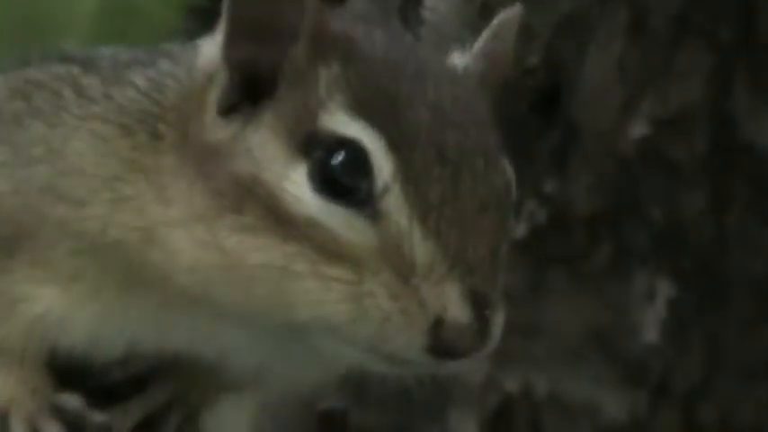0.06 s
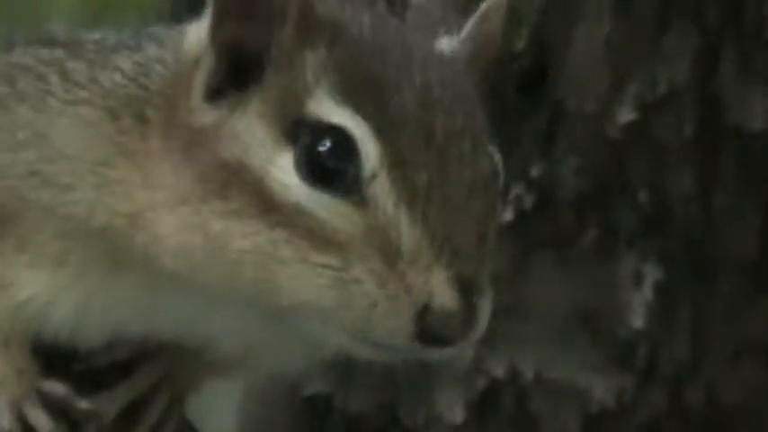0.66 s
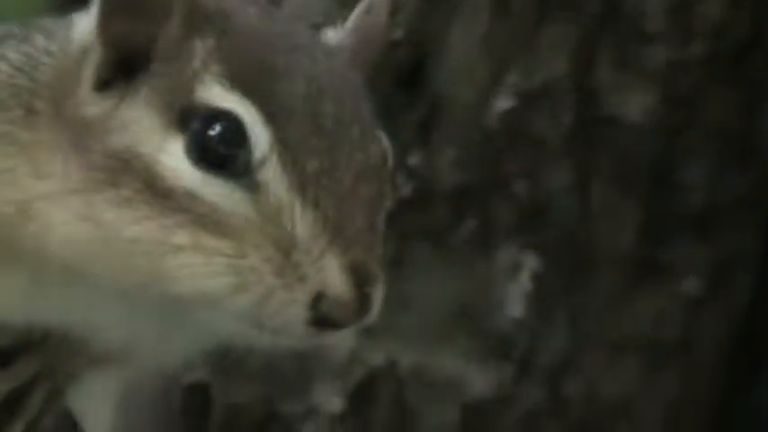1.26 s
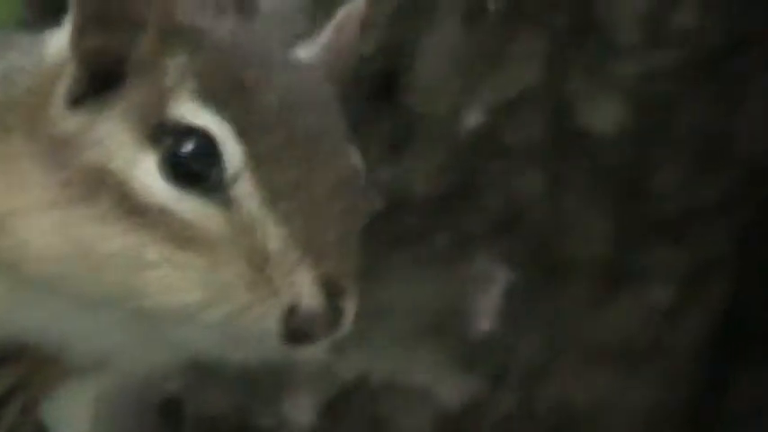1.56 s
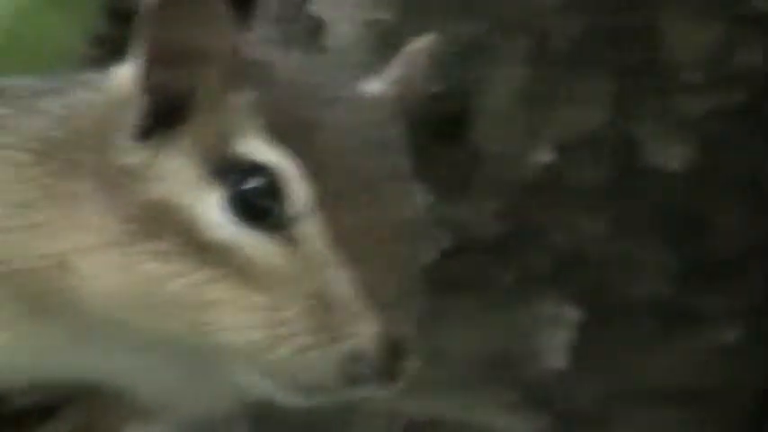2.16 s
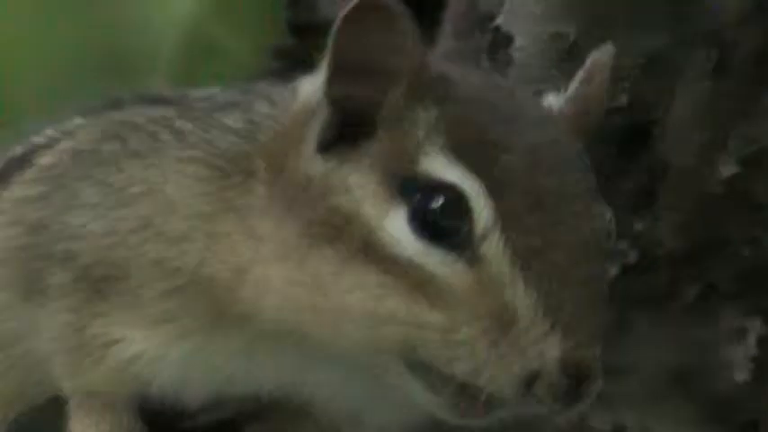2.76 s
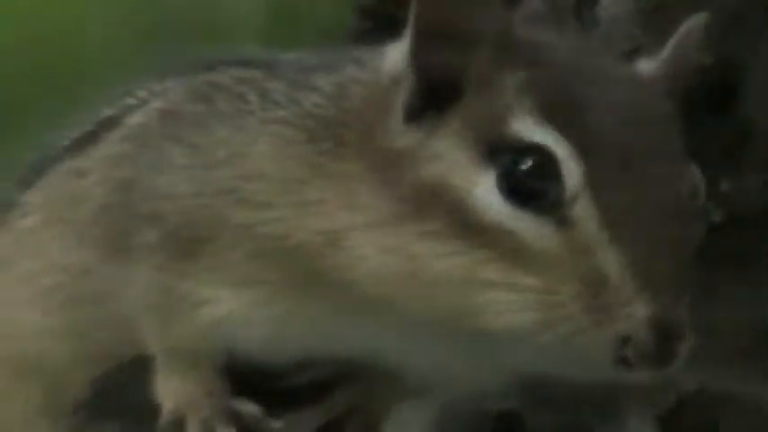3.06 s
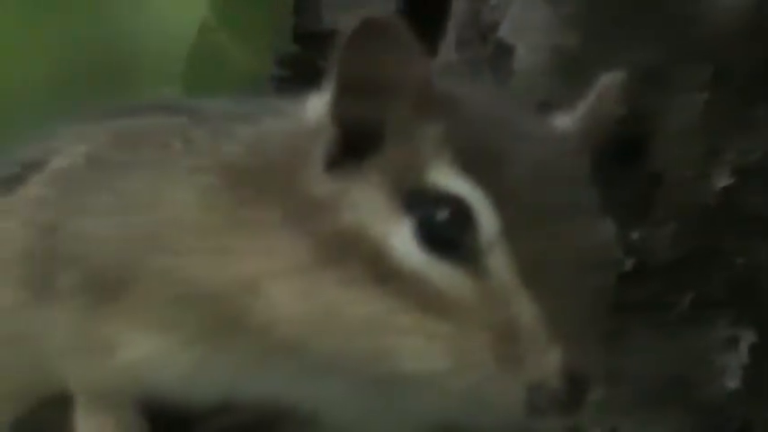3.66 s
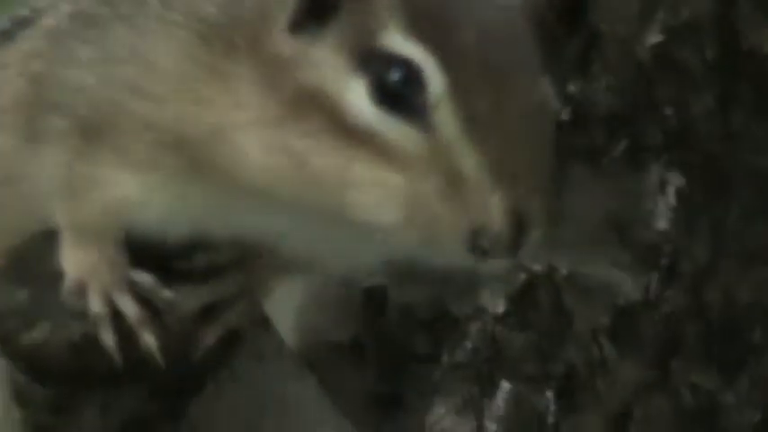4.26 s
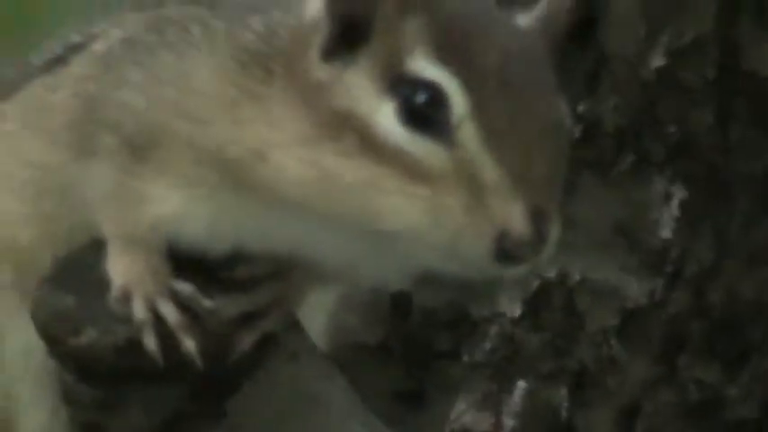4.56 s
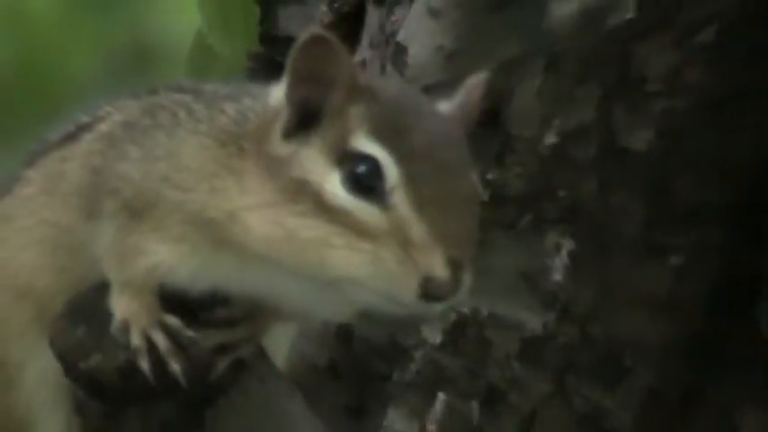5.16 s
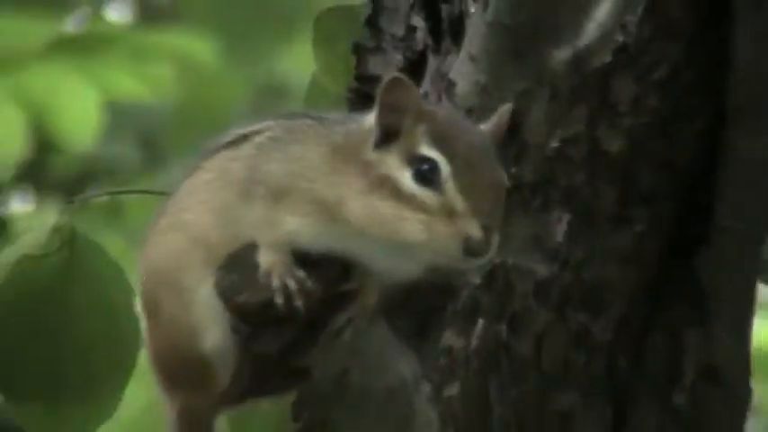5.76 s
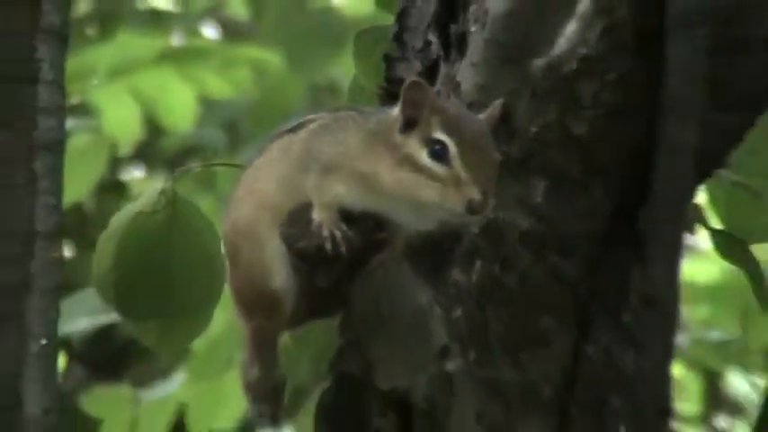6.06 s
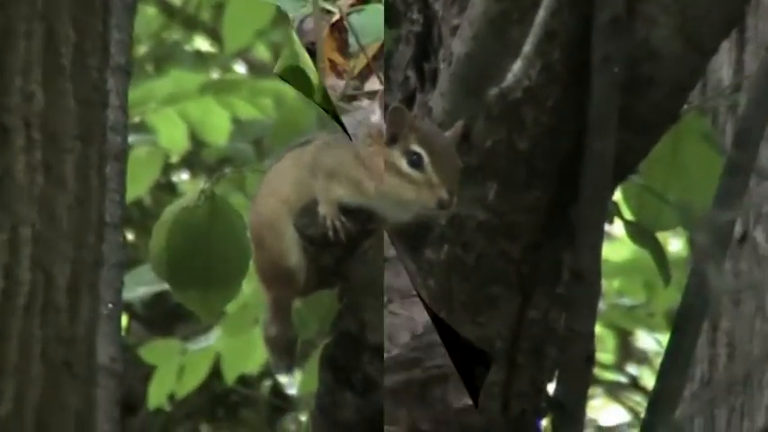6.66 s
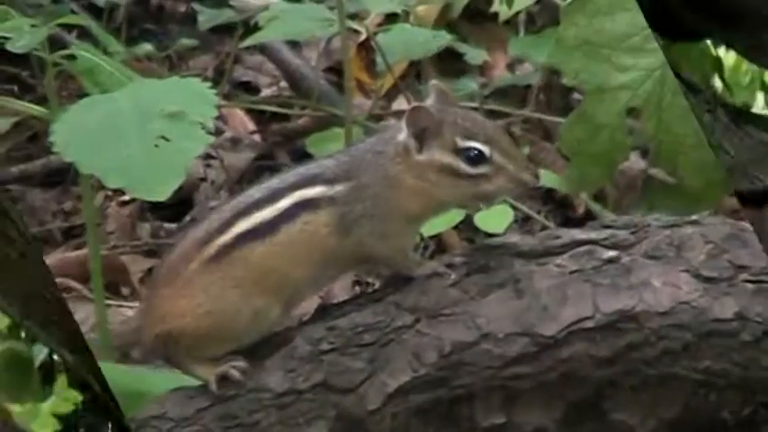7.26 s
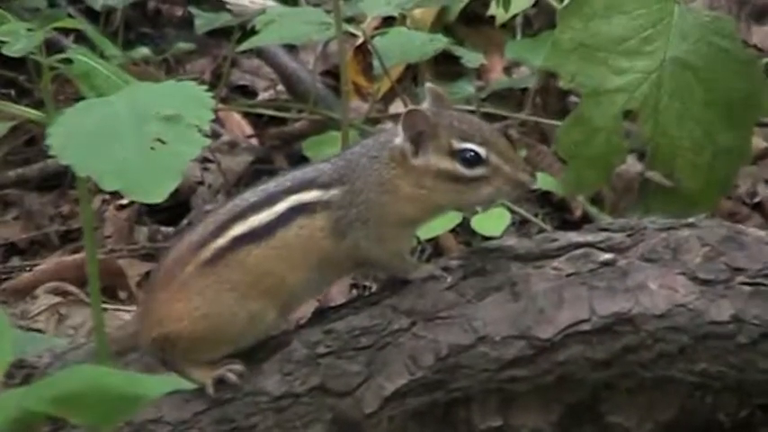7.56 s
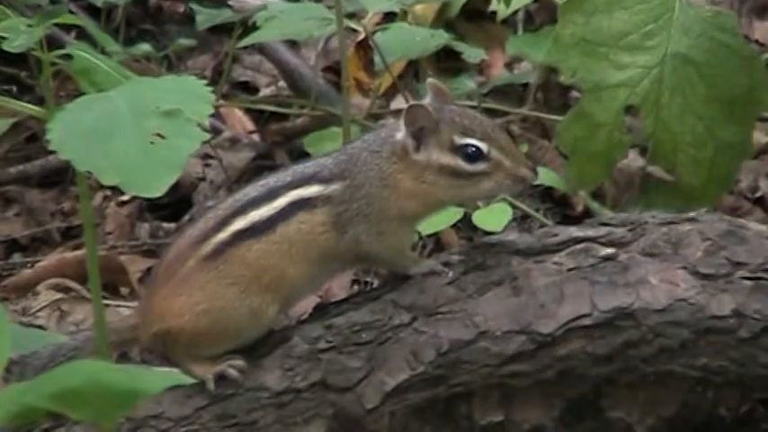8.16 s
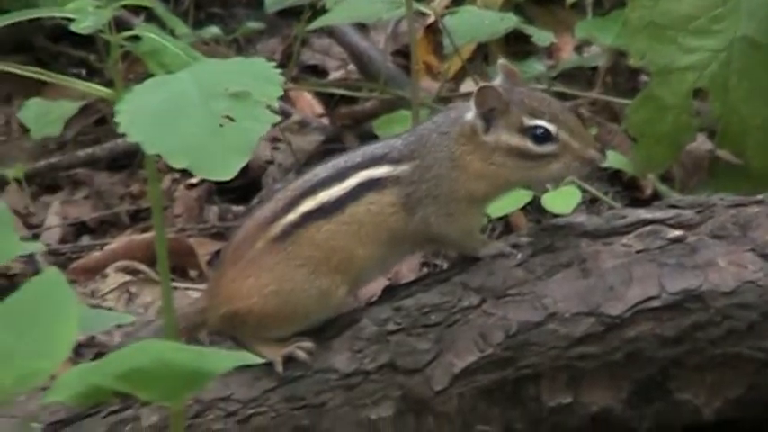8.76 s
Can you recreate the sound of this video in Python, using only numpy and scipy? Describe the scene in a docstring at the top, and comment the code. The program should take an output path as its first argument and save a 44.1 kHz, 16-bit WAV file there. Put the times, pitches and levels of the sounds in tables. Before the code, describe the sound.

Chipmunks trade sharp, high chips in woodland over a distant traffic-like rush, until a very close one takes over.

```python
"""Woodland: over a distant traffic-like rush, hum and engine, a far chipmunk chips in a steady beat.
Each chip is one whistle plunging from about 11 kHz to 4 kHz, scattered among trunks.
From 0.8 s a nearer one answers; thin bird notes and a few twig ticks lie behind.
Around 7 s the background fades to a quieter spot and a very close chipmunk takes over;
the recorder ducks under the loudest chips."""
import sys
import numpy as np
from scipy import signal
from scipy.fft import rfft, irfft, next_fast_len
from scipy.io import wavfile
from scipy.ndimage import uniform_filter1d, minimum_filter1d, map_coordinates

SR = 44100
rng = np.random.default_rng(int(sys.argv[2]) if len(sys.argv) > 2 else 0)


def persist_wave(psi):
    """Save psi, clipped to +-1, as 16-bit WAV."""
    counts = np.round(np.clip(psi, -1, 1) * 32767).astype(np.int16)
    wavfile.write(sys.argv[1], SR, np.atleast_2d(counts).T)


N = 396900
TIME_S = np.arange(N) / SR


def amp(db):
    """Decibels to gain."""
    return 10 ** (np.asarray(db) / 20)


def unit_rms(x):
    """Scale to rms 1."""
    return x / np.sqrt(np.mean(x ** 2) + 1e-20)


def log_interp(points, hz):
    """Interpolate (frequency [Hz], value) points on a log axis."""
    knots_hz, values = np.transpose(points)
    return np.interp(np.log(hz + 1), np.log(knots_hz + 1), values)


def wobble(knots_per_s, size):
    """Smooth random curve."""
    knots = rng.standard_normal(int(size * knots_per_s / SR) + 4)
    return map_coordinates(knots, [np.arange(size) * knots_per_s / SR])


def filtered(x, response):
    """FFT filter with gain response(hz)."""
    size = x.shape[-1]
    padded = next_fast_len(size + 8192)
    return irfft(rfft(x, padded) * response(np.fft.rfftfreq(padded, 1 / SR)), padded)[..., :size]


def add(track, time_s, sound):
    """Mix a stereo sound in at time_s."""
    start = max(round(time_s * SR), 0)
    part = sound[:, :N - start]
    track[:, start:start + part.shape[1]] += part


def stereo_noise(correlation, size):
    """White noise with the given left-right correlation."""
    angle = np.arccos(np.clip(correlation, -1, 1)) / 2
    mid, side = rng.standard_normal((2, size)) * [[np.cos(angle)], [np.sin(angle)]]
    return np.array([mid + side, mid - side])


# Stereo image of the rush: (frequency [Hz], left-right correlation [ratio])
RUSH_CORRELATION = [(60, .93), (250, 0.76), (1000, 0.86), (2500, 0.29), (6000, 0.51), (14000, 0.14)]
# Rush spectrum at each spot: (frequency [Hz], relative density [dB])
FIRST_RUSH = [(12, -56), (20, -12), (113, -3), (268, -7), (355, -6.5), (431, -9), (469, -9), (570, -8.5),
              (1280, -12.5), (3130, -25), (5030, -29), (5470, -31.5), (7440, -35.5), (8310, -38.5),
              (15800, -49)]
SECOND_RUSH = [(20, -21), (50, -2), (100, 1), (160, -3.5), (300, -5), (500, -7.5), (900, -11.5),
               (1500, -17), (2800, -23.5), (5000, -25.5), (8000, -26), (12000, -41), (16000, -44)]


def rush(spectrum):
    """Distant traffic-like noise, near mono in the bass, normalised on its middle band."""
    def mid_side_gain(hz):
        angle = np.arccos(np.clip(log_interp(RUSH_CORRELATION, hz), -1, 1)) / 2
        return amp(log_interp(spectrum, hz)) * [np.cos(angle), np.sin(angle)]
    mid, side = filtered(rng.standard_normal((2, N)), mid_side_gain)
    body = filtered(mid, lambda hz: (hz > 200) & (hz < 2500))
    return np.array([mid + side, mid - side]) / body.std() * amp(.35 * wobble(6.1, N))


def drone(centre_hz, waver_hz):
    """One far engine note, wavering in pitch and strength."""
    phase = 2 * np.pi * np.cumsum(centre_hz + waver_hz * wobble(14, N)) / SR
    return unit_rms(np.sin(phase) * amp(2 * wobble(9, N)))


# Machinery partials: (frequency [Hz], waver depth [Hz], level [dB])
HUM_PARTIALS = [(118.5, 5, -51.5), (237, 3, -60.5), (472.5, 2.49, -58.5)]


def machinery_hum():
    """Three wavering partials under one slow swell."""
    swell = amp(wobble(1.6, N))
    return swell * sum(amp(db) * drone(hz, waver_hz) for hz, waver_hz, db in HUM_PARTIALS)


# Engine envelope: (time [s], level [dB])
ENGINE_LEVELS = [(0.2, -45.5), (1.5, -54), (2.4, -46.5), (3.5, -56), (4.3, -45.5), (6.0, -56.0), (7.2, -50),
                 (7.8, -42), (8.3, -45), (9.0, -57)]


def engine():
    """A distant engine's low note swells and fades."""
    level_db = np.interp(TIME_S, *np.transpose(ENGINE_LEVELS))
    return amp(level_db) * drone(centre_hz=75.1, waver_hz=2.7)


def background(first_db=-42, swell_db_per_s=0.1152, second_db=-45.5, fade_start_s=6.65, fade_s=0.64):
    """Rush and hum crossfade to the quieter spot's rush; the engine runs throughout."""
    blend = np.clip((TIME_S - fade_start_s) / fade_s, 0, 1)
    first = machinery_hum() + amp(first_db + swell_db_per_s * TIME_S) * rush(FIRST_RUSH)
    second = amp(second_db) * rush(SECOND_RUSH)
    return (1 - blend) * first + blend * second + engine()


# Twig ticks: (time [s], level [dB], band centre [Hz])
TWIG_TICKS = [(2.56, -41, 1900), (3.288, -43, 2600), (6.402, -52, 7000)]


def twigs(t60_s=.08):
    """Dry ticks in the undergrowth; thinner twigs sound higher."""
    track = np.zeros((2, N))
    t = np.arange(SR // 10) / SR
    for time_s, db, centre_hz in TWIG_TICKS:
        band = lambda hz: 1 / (1 + 2 * np.log2((hz + 1) / centre_hz) ** 4) / (1 + (hz / 11000) ** 6)
        crack = unit_rms(filtered(stereo_noise(.6, len(t)), band))
        add(track, time_s, crack * amp(db - 60 * t / t60_s))
    return track


# Colour of the scattered sound: (frequency [Hz], gain [dB])
SCATTER_EQ = [(3000, 1), (4200, -3), (5100, 0.5), (6500, -0.5), (8400, 1.5), (10000, -2), (11800, 6),
              (12800, -6), (15000, -2)]


def woods(x, pan_db, bark_db, leaf_db, leaf_t60_s, trunk_db, trunk_t60_s, tilt_db_per_oct):
    """Direct sound, glints off nearby bark, quick scatter from leaves, long tail from trunks."""
    size = SR * 3 // 4
    t = np.arange(size) / SR
    leaves = stereo_noise(0.49, size) * amp(-60 * t / leaf_t60_s + 1.4 * rng.standard_normal(size))
    leaves *= 1 - np.exp(-t / 0.011)
    bin_hz, age_s, spectra = signal.stft(stereo_noise(0.24, size), SR, nperseg=128)
    t60_s = trunk_t60_s * (8000 / np.clip(bin_hz, 4000, None)) ** 0.48  # leaves and air absorb treble
    trunks = signal.istft(spectra * amp(-60 * age_s / t60_s[:, None]), SR, nperseg=128)[1][:, :size]
    trunks = trunks * amp(1.5 * wobble(60, size)) * (1 - np.exp(-t / 0.018))
    scatter = (amp(leaf_db) * unit_rms(leaves) + amp(trunk_db) * unit_rms(trunks)) / np.sqrt(size)
    # treble beams forward, so less returns
    tilt_db = lambda hz: tilt_db_per_oct * np.log2(np.clip(hz, 4500, None) / 8000)
    scatter = filtered(scatter, lambda hz: amp(log_interp(SCATTER_EQ, hz) + tilt_db(hz)))
    # glints beat against a gliding pitch, differently per ear
    for delay_s in rng.uniform(.0012, .007, size=4):
        scatter[[0, 1], int(delay_s * SR) + rng.integers(0, 2, size=2)] += amp(bark_db)
    out = signal.fftconvolve(x[None], scatter, axes=1)
    out[:, :len(x)] += x * amp([[pan_db / 2], [-pan_db / 2]])
    return out


# Bird notes: (time [s], length [s], first pitch [Hz], last pitch [Hz], relative level [dB],
# buzz depth [share of pitch])
BIRD_CALLS = [(0.0, .05, 7700, 7550, -57, 0.0038), (1.494, 0.062, 7600, 7240, -35.5, 0.0058),
              (1.605, 0.035, 7500, 9300, -47.5, .03), (1.665, 0.055, 5470, 6880, -32.5, 0.026),
              (1.675, 0.023, 6040, 6010, -39, .015), (1.841, 0.087, 2950, 3160, -47.5, 0.078),
              (1.978, 0.037, 6600, 6000, -45, .07), (2.522, .13, 6900, 7130, -54, 0.0017),
              (5.374, 0.034, 6680, 7330, -37.5, 0.0093), (5.828, 0.09, 7130, 7000, -56, 0.0043),
              (7.824, 0.044, 3450, 3550, -55, 0.011)]


def birds():
    """Thin or buzzy notes slide onto a held pitch, so distant that they are mostly echo."""
    track = np.zeros((2, N))
    for time_s, length_s, first_hz, last_hz, db, buzz in BIRD_CALLS:
        progress = np.linspace(0, 1, int(length_s * SR))
        hz = last_hz + (first_hz - last_hz) * (1 - progress) ** 2.5
        hz *= 1 + buzz * wobble(350, len(hz))
        note = np.sin(2 * np.pi * np.cumsum(hz) / SR) * np.sqrt(np.abs(np.sin(np.pi * progress)))
        sound = woods(note, pan_db=4, bark_db=-11.5, leaf_db=2, leaf_t60_s=.12,
                      trunk_db=-1, trunk_t60_s=0.66, tilt_db_per_oct=-6.5)
        add(track, time_s, amp(db - 6.5) * sound)
    return track


def chip(top_hz, lead_ms=6.5, plunge_db=0, extra_attack_ms=0, last_hz=2900, *, throat, drift_hz_per_ms,
         fall_hz_per_ms, turn_ms, break_hz, drop_hz, attack_ms, overtone_db, rasp_db):
    """One whistle drifts, turns at 0 ms and plunges, breaking once; the throat sets level by pitch."""
    # (frequency [Hz], gain [dB])
    mouth_eq = [(7000, -10), (11500, -6), (13500, 0), (14400, -11), (15800, -13), (17500, -60)]
    rasp_eq = [(2500, -27), (4500, -6), (9000, -4.5), (16000, -12)]
    ms = np.arange(-40, 50, 1000 / SR)
    past_turn_ms = turn_ms * np.logaddexp(0, ms / turn_ms)
    hz = drift_hz_per_ms * ms - (drift_hz_per_ms + fall_hz_per_ms) * past_turn_ms
    hz += top_hz - hz[ms > -lead_ms].max()
    hz -= drop_hz * (1 + np.tanh((break_hz - hz) / 110)) / 2  # voice break
    hz = np.maximum(hz, 1000) * (1 + 0.00058 * wobble(400, len(ms)))
    phase = 2 * np.pi * np.cumsum(hz) / SR
    tone = np.sin(phase)
    for harmonic in (2, 3):
        tone += amp(overtone_db + log_interp(mouth_eq, harmonic * hz)) * np.sin(harmonic * phase)
    rasp = unit_rms(filtered(rng.standard_normal(len(ms)), lambda f: amp(log_interp(rasp_eq, f))))
    tone += amp(rasp_db) * rasp * np.clip((top_hz - hz) / 2600, 0, 1) * (ms > 0)
    attack = np.clip((ms + lead_ms) / (attack_ms + extra_attack_ms), 0, 1)
    release = np.clip((hz - last_hz) / 200 + .5, 0, 1)
    level_db = log_interp(throat, hz) + plunge_db * (hz < break_hz) + 0.65 * wobble(255, len(ms))
    return tone * uniform_filter1d(attack * release * amp(level_db), size=40)


def chipmunk(voice, chips, gain_db, **perch):
    """One animal repeats its chip from one perch."""
    track = np.zeros((2, N))
    for turn_s, db, *shape in chips:
        sound = woods(chip(*shape, **voice), **perch)
        add(track, turn_s - .04, amp(db + gain_db) * sound)
    return track


# Throat response: (pitch [Hz], gain [dB])
FAR_THROAT_EQ = [(3600, -31.5), (4400, -18.5), (4900, -11.5), (5600, -15.5), (7400, -8.5), (8400, 0),
                 (9900, -7), (10700, -9), (11600, -16.5), (12100, -10)]
# Chips: (turn time [s], relative level [dB], top pitch [Hz])
FAR_CALLS = [(.1115, -21, 12200), (0.6083, -21.5, 12200), (1.1325, -21.5, 12170), (1.743, -18, 12100),
             (2.316, -18.5, 12100), (2.8127, -19, 12200), (3.32, -20, 11980), (3.8072, -20.5, 12040),
             (4.3138, -19.5, 12140), (4.8034, -20, 12100), (5.4788, -18.5, 12140), (6.0146, -20.5, 12200),
             (6.5039, -21.5, 11570), (7.1492, -29.5, 11950)]


def far_chipmunk():
    """A steady beat of steep chips with a brief lead-in and strong scatter."""
    voice = dict(throat=FAR_THROAT_EQ, drift_hz_per_ms=-45, fall_hz_per_ms=285, turn_ms=.9,
                 break_hz=10660, drop_hz=599, attack_ms=3.65, overtone_db=-46, rasp_db=-28)
    return chipmunk(voice, FAR_CALLS, gain_db=-2, pan_db=-6.5, bark_db=-8.5, leaf_db=-.5,
                    leaf_t60_s=0.15, trunk_db=-4, trunk_t60_s=0.45, tilt_db_per_oct=-8)


# Throat response: (pitch [Hz], gain [dB])
ANSWER_THROAT_EQ = [(4100, -18), (4700, -10.5), (6000, -6.5), (7200, -14), (8300, -13.5), (9500, -18.5),
                    (10600, -5.5), (11100, -1.5)]
# Chips: (turn time [s], relative level [dB], top pitch [Hz], lead-in [ms], gain below the break [dB],
# extra attack [ms], last pitch [Hz])
ANSWER_CALLS = [(0.7943, -11.5, 11560, 26.2, -0.5, 2, 4550), (2.8184, -10, 11740, 35, 1, 11, 4500),
                (4.132, -12, 11520, 28.5, 3.5, 1, 4200), (5.6338, -11, 11350, 27.5, -2.5, 5, 4650),
                (6.8717, -17.5, 11480, 26.4, 3, 0.9, 4970)]


def answering_chipmunk():
    """Nearer, almost pure chips with a long, sagging lead-in."""
    voice = dict(throat=ANSWER_THROAT_EQ, drift_hz_per_ms=-16, fall_hz_per_ms=207, turn_ms=3.5,
                 break_hz=9900, drop_hz=1105, attack_ms=4, overtone_db=-62, rasp_db=-45)
    return chipmunk(voice, ANSWER_CALLS, gain_db=-4.5, pan_db=-1, bark_db=-10.5, leaf_db=-10,
                    leaf_t60_s=0.08, trunk_db=-18.5, trunk_t60_s=0.35, tilt_db_per_oct=-3.5)


# Throat response: (pitch [Hz], gain [dB])
CLOSE_THROAT_EQ = [(2900, -49.5), (3550, -21), (4700, -10.5), (5900, -6), (7300, -5.5), (8500, -4),
                   (9150, -1), (10300, 1.5)]
# Chips: (turn time [s], relative level [dB], top pitch [Hz], lead-in [ms])
CLOSE_CALLS = [(6.903, -8, 10570, 28), (7.265, -2.5, 10270, 28.3), (7.6348, -1, 10690, 31),
               (7.968, -1.5, 10370, 28.5), (8.2812, -.5, 10130, 26.5), (8.5858, 0, 10200, 26),
               (8.884, 0, 10030, 26)]


def close_chipmunk(entry_s=7.05):
    """Loud chips with a rising lead-in and overtones; cuts in during the first chip's echo."""
    voice = dict(throat=CLOSE_THROAT_EQ, drift_hz_per_ms=98, fall_hz_per_ms=194, turn_ms=5.3,
                 break_hz=7000, drop_hz=750, attack_ms=8.7, overtone_db=-8.5, rasp_db=-23.5)
    track = chipmunk(voice, CLOSE_CALLS, gain_db=-1.5, pan_db=-2.5, bark_db=-18.5, leaf_db=-14.5,
                     leaf_t60_s=0.11, trunk_db=-21, trunk_t60_s=0.61, tilt_db_per_oct=-4)
    return track * (TIME_S > entry_s)


def scene():
    """Chipmunks at three distances over the woodland background."""
    return far_chipmunk() + answering_chipmunk() + close_chipmunk() + birds() + twigs() + background()


def gain_control(x, threshold_db, slope, attack_s, hold_s, release_s):
    """Peaks pull the gain down fast; it holds, then creeps back."""
    over_db = np.maximum(20 * np.log10(np.abs(x).max(axis=0) + 1e-9) - threshold_db, 0)
    window = int(hold_s * SR) | 1
    gain_db = minimum_filter1d(-slope * over_db, window, origin=window // 2)

    def smoothed_db(tau_s):
        pole = np.exp(-1 / (tau_s * SR))
        return signal.lfilter([1 - pole], [1, -pole], gain_db)
    return x * amp(np.minimum(smoothed_db(attack_s), smoothed_db(release_s)))


def record(dry):
    """Gain control, then the recorder's band limit."""
    cutoff_hz = 15800
    ducked = gain_control(dry, threshold_db=-11, slope=0.46, attack_s=.00068, hold_s=.045, release_s=.097)
    return filtered(ducked, lambda hz: np.clip((cutoff_hz - hz) / 200 + .5, 0, 1))


dry = scene()
out = record(dry)
persist_wave(out)
```